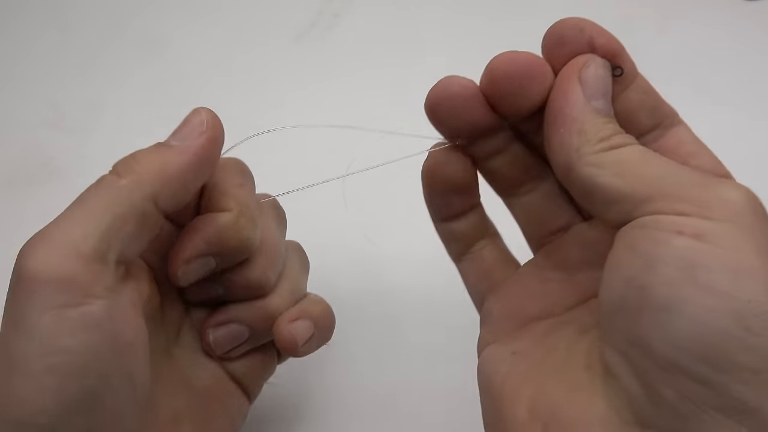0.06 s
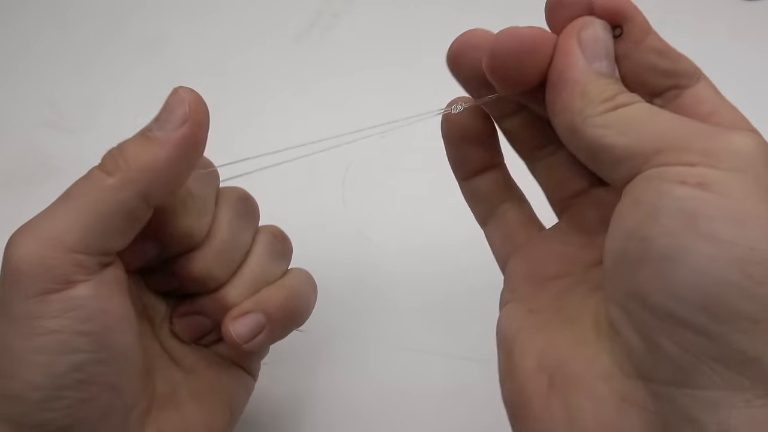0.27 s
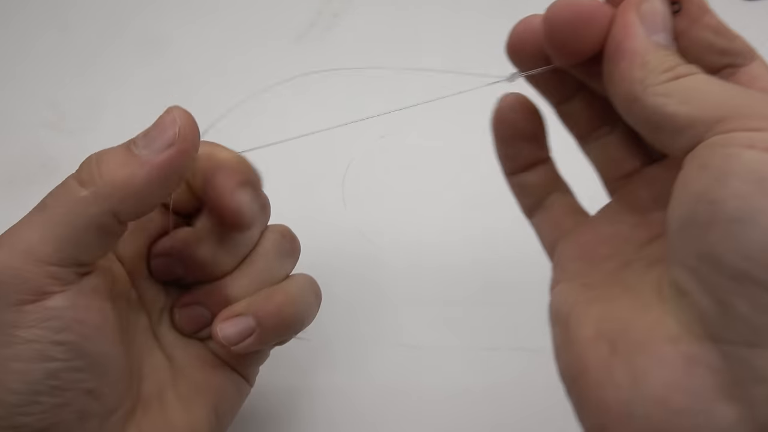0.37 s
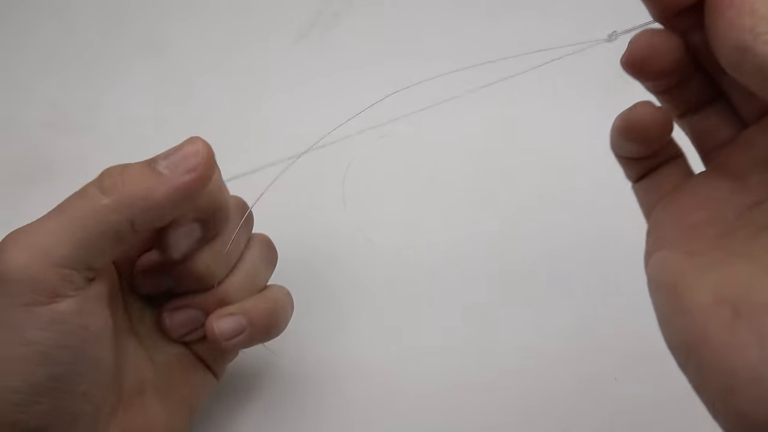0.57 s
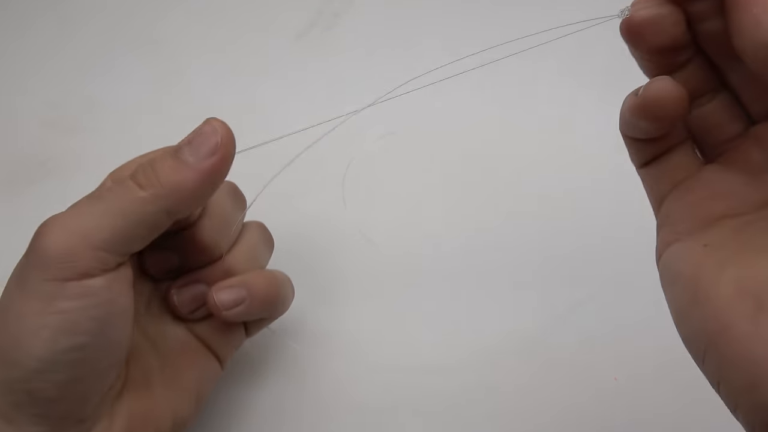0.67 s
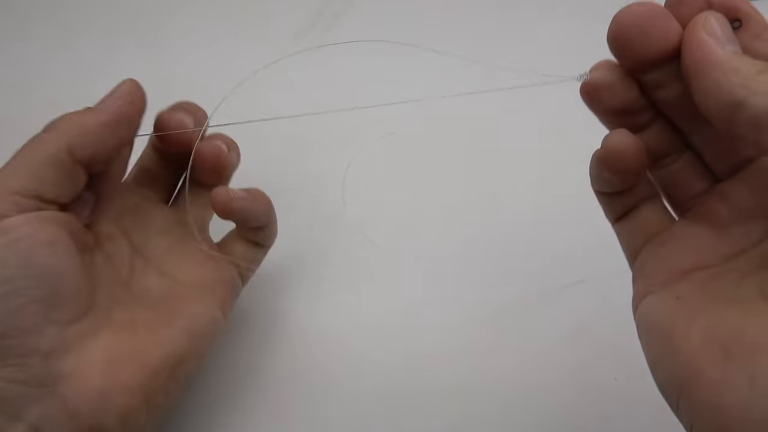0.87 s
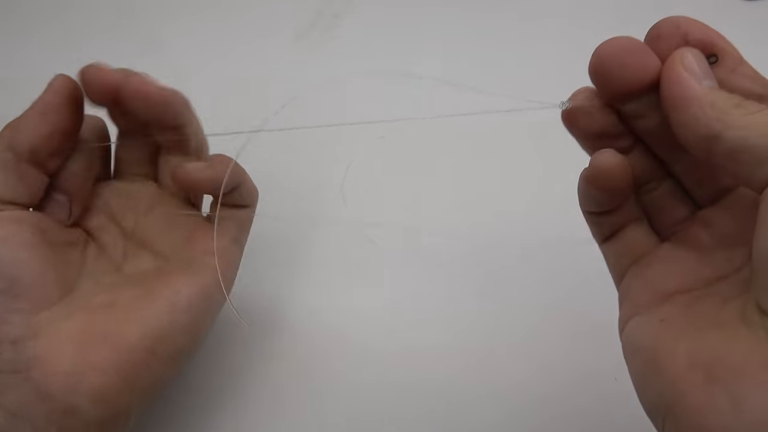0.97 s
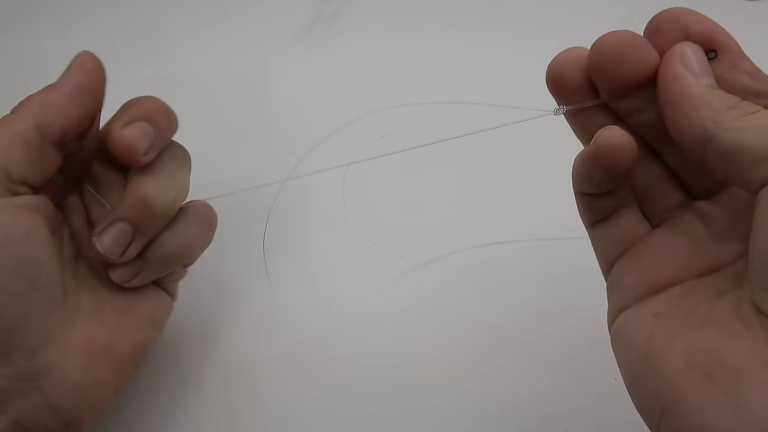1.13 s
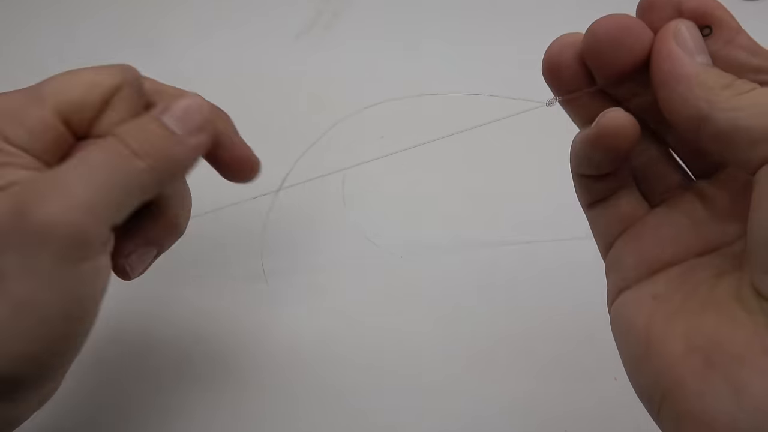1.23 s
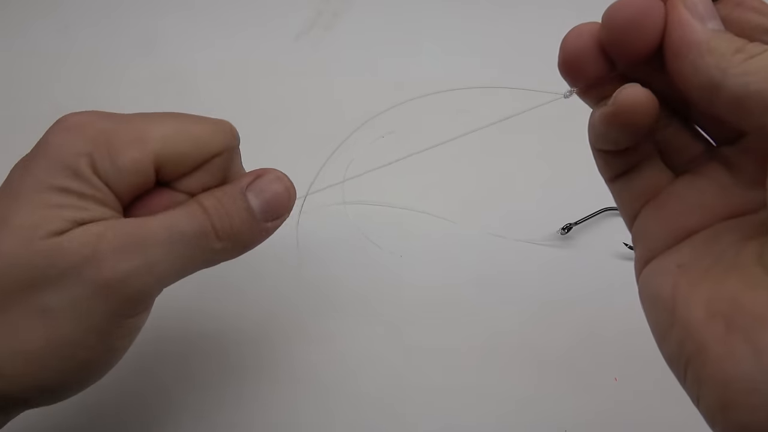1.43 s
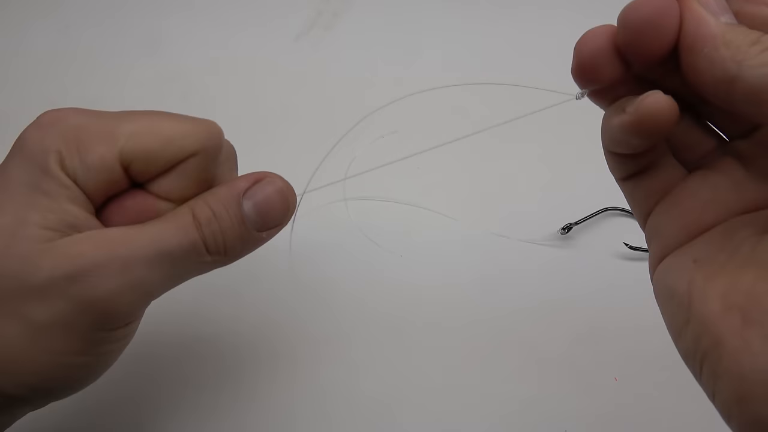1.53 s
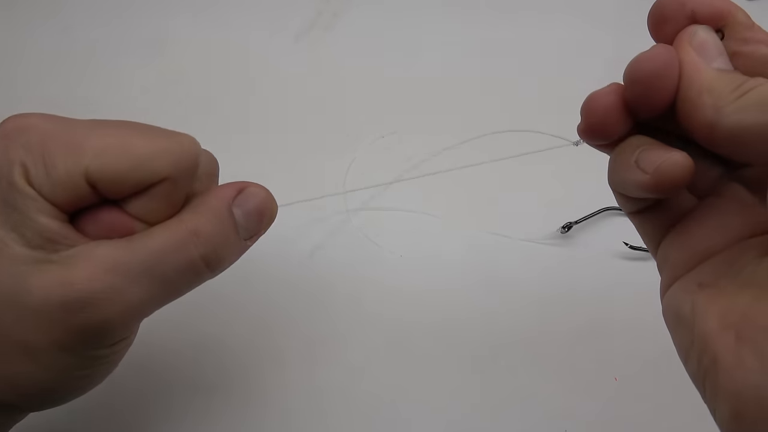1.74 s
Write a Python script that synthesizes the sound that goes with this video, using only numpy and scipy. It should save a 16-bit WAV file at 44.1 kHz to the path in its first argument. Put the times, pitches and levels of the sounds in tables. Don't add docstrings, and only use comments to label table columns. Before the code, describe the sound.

Hands bump and knock on a table top while handling fishing line, heard close in a quiet room with faint hiss. Low thuds cluster at 0.2-0.4 s, then harder dry knocks at 0.53-0.64 s, with sharp tiny metal ticks around 0.43-0.62 s. Soft dull pushes last until 0.75 s. Faint scratchy rubs and slips of line continue, swelling near 1.1 and 1.45 s, then only hiss after 1.6 s.

```python
import sys
import numpy as np
from scipy import signal
from scipy.fft import rfft, irfft
from scipy.io import wavfile
from scipy.ndimage import uniform_filter1d

SR = 44100
rng = np.random.default_rng(int(sys.argv[2]) if len(sys.argv) > 2 else 0)


def wrap_up_sound(samples):
    columns = np.atleast_2d(samples).T
    tamed = np.clip(columns, -1, 1)
    steps = np.round(tamed * 32767).astype(np.int16)
    wavfile.write(sys.argv[1], SR, steps)


def boost(x):
    u = np.asarray(x, float) / 20
    return 10 ** u


N = 79380

# freq_hz, level_db_per_hz
HISS_SPECTRUM = [(12, -30), (20, -4.5), (120, -10), (193, -21), (270, -14), (558, -21), (976, -19.5),
                 (2670, -24), (16000, -32)]
# freq_hz, likeness_0_1
HISS_LIKENESS = [(60, 0.87), (380, 0.31), (2380, 0.94), (15000, 0.32)]
# freq_hz, share_0_1
UNLIKE_SHARE = [(3000, 0.25), (6000, 0.57), (12000, 0.78)]
# time_s, level_db
SHUFFLE_LEVEL = [
    (0, -61),
    (.15, -58.5),
    (.8, -64.5),
    (.95, -72.5),
    (1.202, -63.5),
    (1.3, -60),
    (1.452, -63),
    (1.55, -74),
    (1.8, -81),
]
# start_s, level_db, contact_ms
BUMPS = [(0.153, -47.5, 2.5), (.2, -30.5, 2.3), (0.22, -21.5, 3.7), (0.236, -19.5, 2.67),
         (0.244, -32.5, 0.67), (.251, -10, 2.9), (.263, -22, 3.2), (.284, -20.5, 2.32), (.298, -36, 2.8),
         (0.336, -24.5, 2.7), (.39, -30, 3.34), (0.445, -40.5, 1.7), (0.491, -35.5, 2.3), (0.538, -19, 2.5),
         (0.556, -20, 1.8), (0.578, -24, 1.1), (.605, -19, 7), (.623, -28, 1.23), (.66, -35.5, 2.8),
         (0.689, -37, 2.86), (0.649, -24.5, 10), (0.701, -25.5, 11.6), (0.744, -29, 10.6)]
# freq_hz, level_db, t60_s, left_right_db
TABLE_MODES = [(77.1, -4.5, 0.46, 2.5), (109.4, -3, 0.2, -3.5), (122.04, -9, 0.46, -2),
               (137.8, -6, 0.2, -4), (218.1, -5, 0.24, 1), (246.6, -3, 0.078, 2.5), (323, -17, 0.077, -9),
               (434.6, -5.5, 0.13, -4), (500, -4.5, 0.038, 5.5), (855, -15.5, 0.03, 18)]
# start_s, level_db, centre_hz, t60_s, clean_blow_db
KNOCKS = [(0.197, -45.5, 1190, 0.2, 3), (.24, -27, 1940, 0.039, 5), (.244, -28.5, 660, 0.056, 18),
          (0.2838, -37, 490, 0.014, 5), (0.5345, -21, 1116, 0.011, 18.5), (.5363, -21.5, 1830, .02, 16),
          (.6215, -24, 2350, 0.037, 21.5), (.624, -28.5, 906, 0.051, 13), (.529, -36, 900, 0.042, 14),
          (.641, -36.5, 1600, 0.031, 11), (0.434, -51.5, 1500, 0.16, -6)]
# freq_hz, width_hz, level_db
STIFF_NEAR = [(512, 160, 11.5), (800, 134, -1), (927, 114, 7.5), (1483, 26, 10), (1683, 180, 5.5),
              (2300, 290, 5), (2600, 200, 2), (3200, 450, -9)]
# freq_hz, width_hz, level_db
STIFF_FAR = [(755, 260, 8.8), (1217, 170, 4.3), (1446, 110, 8.6), (1750, 160, 7), (2260, 120, 5),
             (2586, 100, 5), (2850, 180, 3.9), (3320, 91, 7)]
# freq_hz, width_hz, lift_db
COLOUR_PEAKS = [(2670, 660, 7.5), (3300, 250, 3.5), (4200, 420, 4), (4900, 300, 2.5), (5900, 300, 2.5),
                (7210, 380, 5.5), (8200, 400, 3), (9030, 300, 4.5)]
# start_s, level_db, centre_hz, length_s
SLIPS = [(0.139, -60.5, 5720, 0.03), (0.241, -35.5, 6700, 0.019), (0.431, -44, 6000, 0.0035),
         (0.434, -41.5, 5440, 0.0046), (0.441, -33.5, 6200, 0.012), (0.601, -30.5, 9000, 0.0083),
         (0.637, -32, 6450, 0.0084), (0.646, -41.5, 8000, 0.004), (0.682, -39, 8950, .008),
         (0.7202, -38, 6400, 0.018), (0.765, -40, 7150, 0.013), (0.784, -45, 5170, 0.015),
         (0.796, -40, 7900, 0.011), (0.839, -44.5, 7450, 0.024), (0.867, -38.5, 8100, 0.016),
         (0.885, -40, 7800, 0.0081), (0.902, -44, 7400, 0.011), (0.942, -36.5, 9300, 0.0022),
         (0.99, -44.5, 8600, 0.035), (1.036, -46, 8040, 0.0099), (1.069, -49, 4420, 0.011),
         (1.091, -40, 4900, 0.0057), (1.102, -44, 6950, 0.0038), (1.128, -48, 4400, 0.006),
         (1.178, -56, 6300, 0.009), (1.21, -50, 3100, 0.013), (1.226, -46.5, 4200, 0.0099),
         (1.344, -51, 4500, .006), (1.381, -45, 4850, .009), (1.423, -44, 4930, 0.015),
         (1.4428, -42, 3720, 0.006), (1.456, -41.5, 3200, 0.011), (1.4893, -42.5, 3730, 0.0066),
         (1.494, -43.5, 4500, 0.013), (1.513, -57, 2600, 0.045), (1.589, -60, 8800, 0.027)]
# time_s, level_db, centre_hz, left_right_db
RUB_STROKES = [(.17, -69.5, 5830, -6), (.21, -39.5, 5950, -4), (.39, -55.5, 5900, -6),
               (.46, -49.5, 7000, -2.5), (.533, -50, 5840, 1), (.545, -31.5, 8600, -2),
               (.66, -39.5, 6700, -3), (.7585, -49, 6940, -1), (.88, -50, 6860, -1.5),
               (.98, -62.5, 7500, -2), (1.0, -56.5, 7940, 0.5), (1.1, -45, 6000, -2),
               (1.18, -48.5, 5500, -1.5), (1.2, -58, 4800, -1), (1.36, -52.5, 4530, 0),
               (1.45, -42.5, 4100, -0.5), (1.505, -49, 4300, 1), (1.54, -65, 3500, -1)]
# start_s, level_db, top_share_0_1, t60_s, top_hz
TICKS = [
    (.4335, -26, 0.64, 0.011, 11900),
    (0.4779, -10, 0.85, 0.014, 12020),
    (0.542, -12, 0.56, 0.015, 12350),
    (0.5694, -19, 0.1, 0.03, 12100),
    (.5725, -16, 0.4, 0.014, 12300),
    (.577, -15, .3, .02, 12400),
    (.582, -7.5, 0.8, 0.0069, 12220),
    (0.5877, -10, 0.74, 0.011, 12300),
    (.6228, -22, 0.05, 0.021, 12100),
]
# freq_hz, level_db
METAL_MODES = [(4100, 0), (4860, -5), (5950, 0.5), (7300, -4), (8700, -2), (9600, -7), (10600, -2),
               (13100, 3)]
# start_s, end_s, freq_hz, level_db
HOOK_RINGS = [(.546, .571, 13846, -27), (.48, .53, 4861, -52), (.485, .54, 12172, -48),
              (.48, .5, 8689, -52), (1.27, 1.32, 752, -67), (.478, .485, 7400, -38),
              (.443, .456, 8950, -43), (.444, .453, 6300, -40), (.541, .545, 7500, -27),
              (.543, .548, 5950, -33), (.569, .574, 8800, -29), (.573, .581, 5800, -30),
              (.5885, .595, 5274, -29), (.593, .603, 12240, -37), (.623, .627, 7800, -31)]


def evened(x):
    return x / np.sqrt(np.mean(x ** 2) + 1e-20)


def read(points, hz):
    f, value = np.transpose(points)
    return np.interp(np.log(hz + 1), np.log(f + 1), value)


def add(mix, start_s, sound):
    part = mix[..., round(start_s * SR):][..., :sound.shape[-1]]
    part += sound[..., :part.shape[-1]]


def panned(x, pan_db):
    return np.array([x * boost(pan_db / 2), x * boost(-pan_db / 2)])


def band(x, hz, octaves):
    f = np.fft.rfftfreq(len(x), 1 / SR) + 1
    bell = np.exp(-.5 * (np.log2(f / hz) / octaves) ** 2)
    return evened(irfft(rfft(x) * bell, len(x)))


def uneven_noise(width):
    return evened(uniform_filter1d(uniform_filter1d(rng.standard_normal(N), width), width))


def hiss():
    frames, hz = N // 256 + 5, np.fft.rfftfreq(1024, 1 / SR)
    a, b, c, d = rng.standard_normal((frames, 513, 4)).T
    same = read(HISS_LIKENESS, hz)[:, None]
    left = a + 1j * b
    right = same * left + np.sqrt(1 - same ** 2) * (c + 1j * d)
    z = np.array([left, right]) * boost(read(HISS_SPECTRUM, hz))[:, None]
    return boost(-60.5) * evened(signal.istft(z, nperseg=1024, noverlap=768)[1][:, :N])


def shuffle():
    time_s, db = np.transpose(SHUFFLE_LEVEL)
    level_db = np.interp(np.arange(N) / SR, time_s, db) + 1.2 * uneven_noise(900)
    return panned(band(rng.standard_normal(N), 120, octaves=1.86) * boost(level_db), 1)


def table():
    lag_s, radiates_above_hz = .0001, 118
    t, force = np.arange(SR // 2) / SR, np.zeros(N)
    for start_s, db, contact_ms in BUMPS:
        u = t[:600] * 1000 / contact_ms
        push = np.sin(np.pi * np.minimum(u, 1)) ** 2
        add(force, start_s, boost(db) * push / push.sum())
    side_t = t + np.array([[0], [lag_s]])
    ring = np.zeros((2, len(t)))
    for hz, db, t60_s, pan_db in TABLE_MODES:
        ring += panned(boost(db - 60 * t / t60_s), pan_db) * np.sin(2 * np.pi * hz * side_t)
    cut = signal.butter(4, radiates_above_hz, "high", fs=SR, output="sos")
    return signal.sosfilt(cut, signal.oaconvolve(force[None], ring, axes=1)[:, :N])


def knocks():
    tail_db, tail_t60_s, far_after_s = -6, 0.29, .6
    t, out = np.arange(SR // 3) / SR, np.zeros(N)
    f = np.fft.rfftfreq(len(t), 1 / SR)
    for start_s, db, hz, t60_s, blow_db in KNOCKS:
        modes = STIFF_FAR if start_s > far_after_s else STIFF_NEAR
        body = sum(boost(g) / (1 + 2j * (f - c) / width) for c, width, g in modes)
        shape = boost(-60 * t / t60_s) + boost(tail_db - 60 * t / tail_t60_s)
        crack = np.minimum(t / 0.0015, 1) * shape * band(rng.standard_normal(len(t)), hz, octaves=1.0)
        u = t - .002
        blow = boost(blow_db) * np.exp(-(u * hz * 2) ** 2) * np.sin(2 * np.pi * hz * u)
        spectrum = rfft(crack) * (1.28 + body) + rfft(blow) * body
        add(out, start_s, boost(db - 11.5) * irfft(spectrum, len(t)))
    return panned(out, -1.3)


def room(x):
    room_db, room_t60_s = -2.5, 0.048
    t = np.arange(SR // 4) / SR
    tail = rng.standard_normal((2, len(t))) * boost(-60 * t / room_t60_s)
    tail /= np.linalg.norm(tail, axis=1, keepdims=True)
    late = signal.oaconvolve(x, tail, axes=1)[:, :N]
    wide = read(UNLIKE_SHARE, np.fft.rfftfreq(N, 1 / SR))
    return x + irfft(wide * rfft(boost(room_db) * late), N)


def peaked(x):
    f = np.fft.rfftfreq(N, 1 / SR)
    lift_db = sum(db / (1 + (2 * (f - hz) / width) ** 2) for hz, width, db in COLOUR_PEAKS)
    return irfft(rfft(x) * boost(lift_db - 2.5) / np.sqrt(1 + (1700 / (f + 1)) ** 6), N)


def slips():
    t, out = np.arange(3000) / SR, np.zeros((2, N))
    rub_s, _, _, rub_pan_db = np.transpose(RUB_STROKES)
    draws = rng.standard_normal((len(SLIPS), 2, len(t)))
    for (start_s, db, hz, length_s), (a, b) in zip(SLIPS, draws):
        decay = np.exp(-(t / length_s) ** 2) + 0.05 * np.exp(-t / 0.018)
        shape = np.minimum(t / (0.21 * length_s), 1) * decay
        grit = band(a * boost(1.2 * b), hz, octaves=0.71)
        add(out, start_s, panned(boost(db) * shape * grit, np.interp(start_s, rub_s, rub_pan_db)))
    return out


def rub():
    grains_per_s, octaves_below, octaves_above = 11000, 1, 1.1
    dull_above_hz, skin_edge_hz = 12400, 2350
    time_s, db, centre_hz, pan_db = np.transpose(RUB_STROKES)
    t = np.arange(N) / SR
    caught = rng.random(N) < grains_per_s / SR
    size = .5 + caught * boost(2.1 * np.minimum(rng.exponential(1, N), 3.5))
    hz, at_s, z = signal.stft(rng.standard_normal((2, N)) * size, SR, nperseg=256, noverlap=192)
    patches = uniform_filter1d(rng.standard_normal(z[0].shape), size=2, axis=0)
    patches = evened(uniform_filter1d(patches, size=16, axis=1))
    wide = 0.38 * read(UNLIKE_SHARE, hz)[:, None]
    z = np.array([z[0] + wide * z[1], z[0] - wide * z[1]])
    hz = hz[:, None]
    z /= np.sqrt((1 + (hz / dull_above_hz) ** 6) * (1 + (skin_edge_hz / (hz + 1)) ** 10))
    away = np.log2((hz + 1) / np.interp(at_s, time_s, centre_hz))
    octaves = np.where(away < 0, octaves_below, octaves_above)
    z = z / (1 + (away / octaves) ** 2) * boost(3.9 * patches)
    x = evened(signal.istft(z, SR, nperseg=256, noverlap=192)[1][:, :N])
    level_db = np.interp(t, time_s, db, left=-100, right=-100) + 1.1 * uneven_noise(300)
    return x * panned(boost(level_db), np.interp(t, time_s, pan_db))


def hook_rings(out):
    fade_db, pair_hz, pair_gain = 4, 170, .3
    for start_s, end_s, hz, db in HOOK_RINGS:
        u = np.arange(0, end_s - start_s, 1 / SR)
        edges = np.clip(np.minimum(u, u[::-1]) / 0.001, 0, 1)
        pair = np.sin(2 * np.pi * hz * u) + pair_gain * np.sin(2 * np.pi * (hz + pair_hz) * u)
        add(out, start_s, boost(db - fade_db * u / u[-1]) * edges * pair)


def ticks():
    t, out = np.arange(4000) / SR, np.zeros(N)
    draws = rng.random((len(TICKS), 2, len(METAL_MODES) + 1))
    for (start_s, db, top, t60_s, top_hz), (size, phase) in zip(TICKS, draws):
        low = np.zeros(len(t))
        for (hz, g), z, p in zip(METAL_MODES, size, phase):
            low += boost(g - 13 * z) * np.sin(2 * np.pi * (hz * (0.89 + 0.037 * p) * t + p))
        low *= 1 + 1.8 * evened(uniform_filter1d(rng.standard_normal(len(t)), size=40))
        ring = np.sin(2 * np.pi * top_hz * t) * (1 + .45 * np.cos(2 * np.pi * 330 * t))
        snap = boost(-5.0 - 60 * t / 0.023) + boost(-3.0 - 60 * t / 0.0038)
        snap = snap * band(rng.standard_normal(len(t)), 8200, octaves=0.65)
        metal = boost(-60 * t / t60_s) * (top * ring + (1 - top) * 0.4 * low)
        add(out, start_s, boost(db) * np.minimum(t / 0.0007, 1) * (metal + (1 - top) * snap))
    hook_rings(out)
    return panned(out, -6.5)


def scene():
    contacts = room(knocks() + peaked(slips()) + ticks())
    return hiss() + shuffle() + table() + peaked(rub()) + contacts


def low_pass(x):
    return signal.sosfilt(signal.butter(12, 16800, fs=SR, output="sos"), x)


def record(dry):
    lowpass = signal.firwin(511, 15900, window=("kaiser", 9), fs=SR)
    mix = signal.oaconvolve(dry, lowpass[None], "same")
    return low_pass(mix)


dry = scene()
out = record(dry)
wrap_up_sound(out)
```